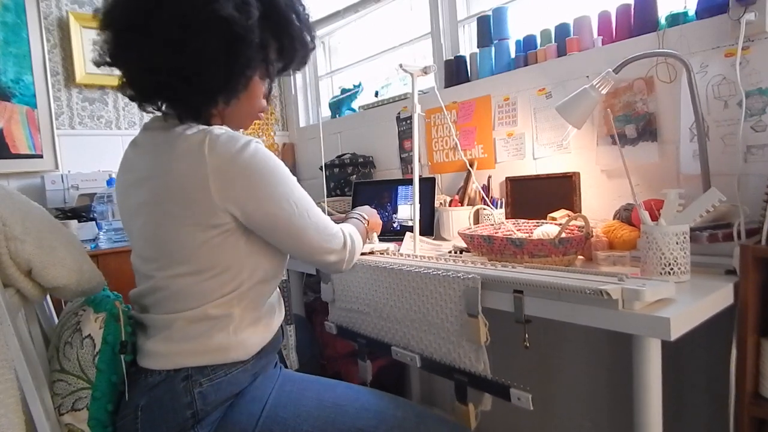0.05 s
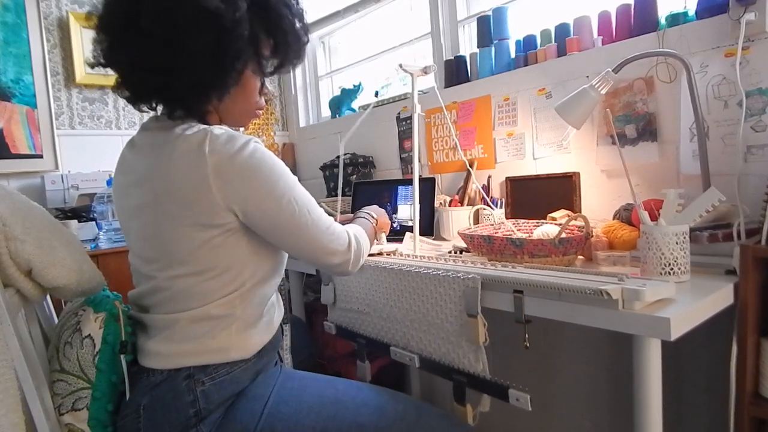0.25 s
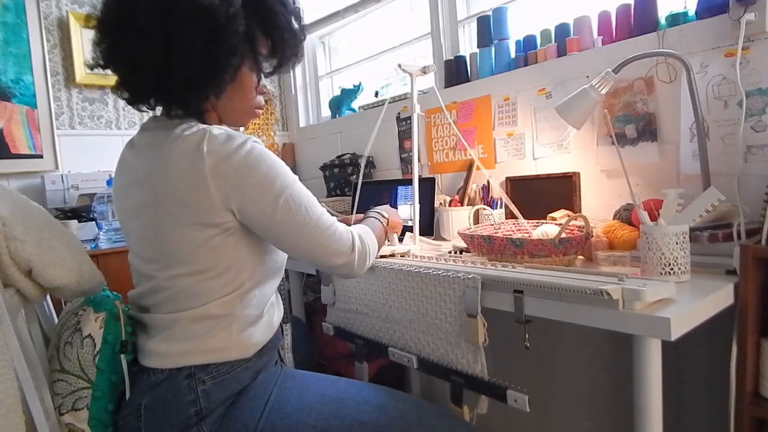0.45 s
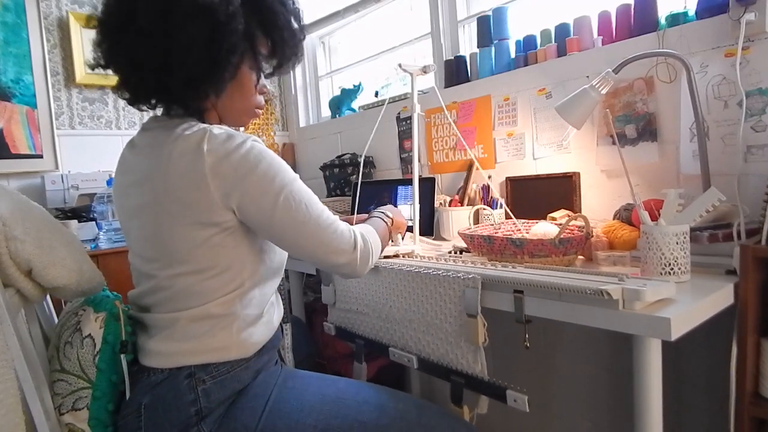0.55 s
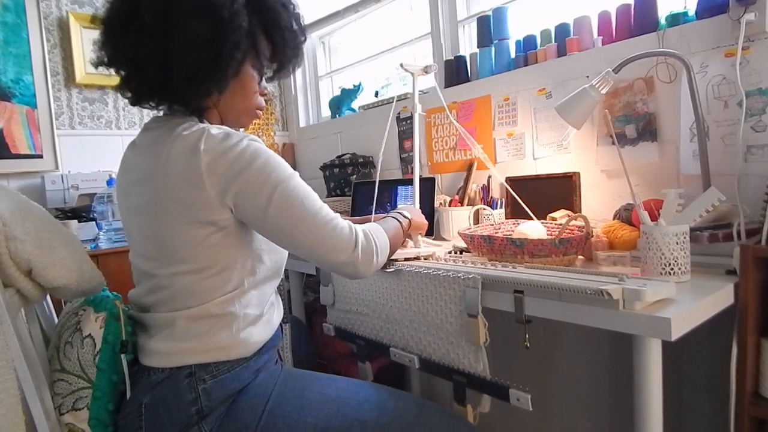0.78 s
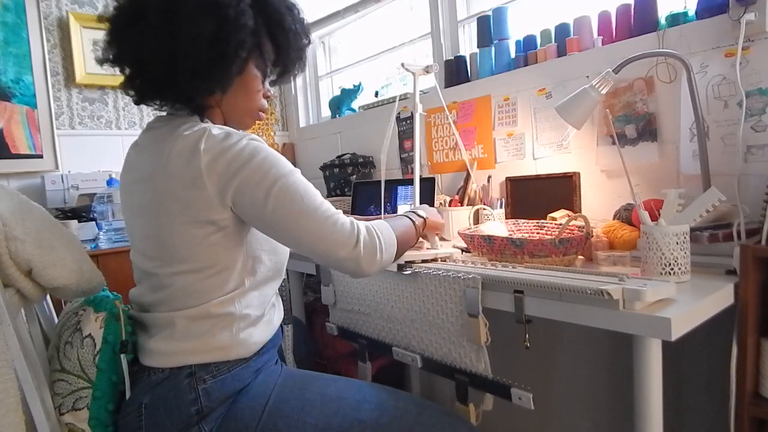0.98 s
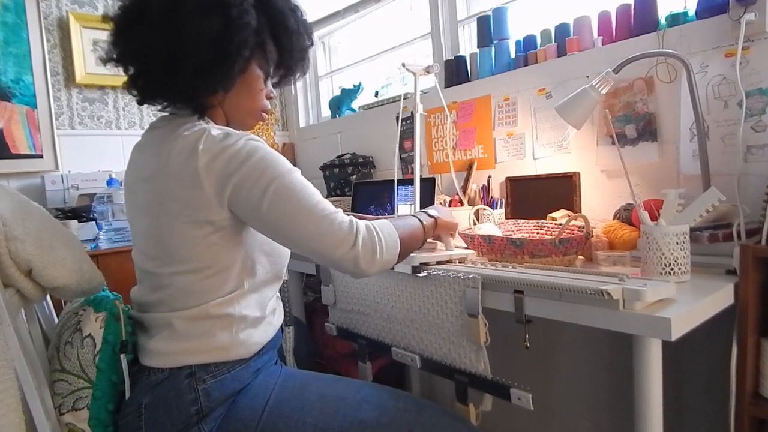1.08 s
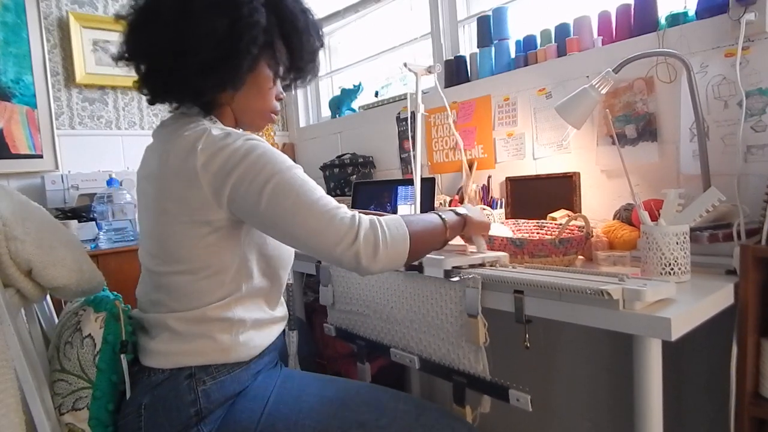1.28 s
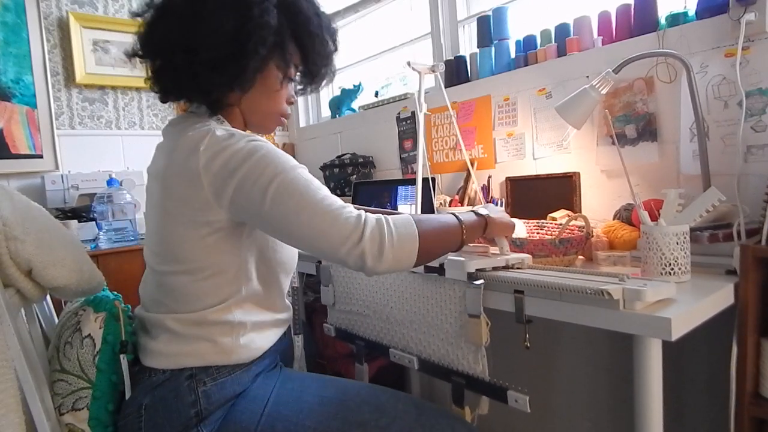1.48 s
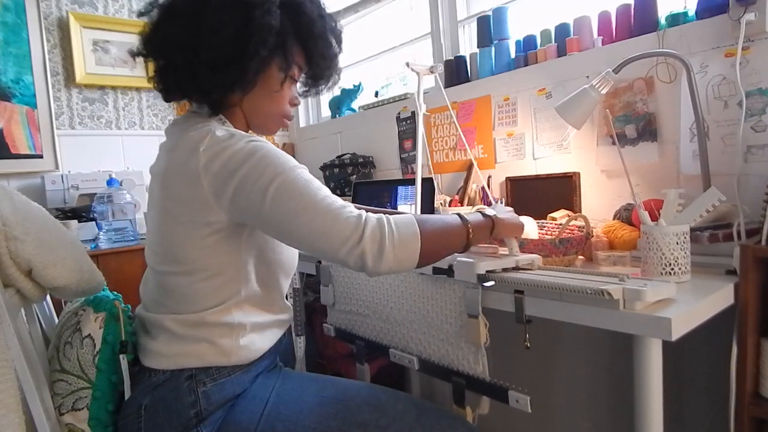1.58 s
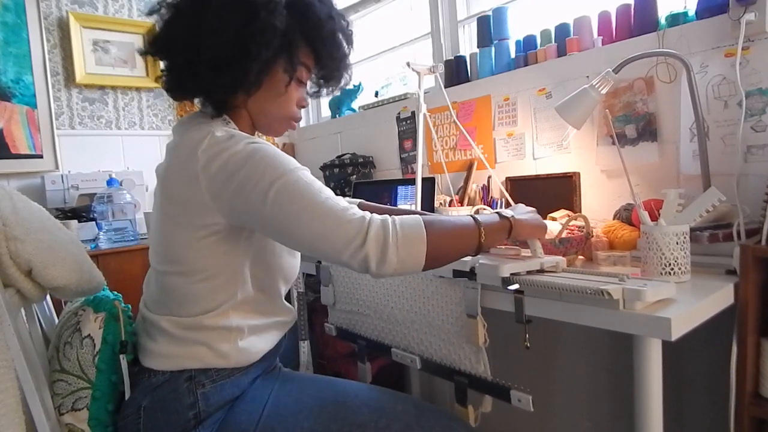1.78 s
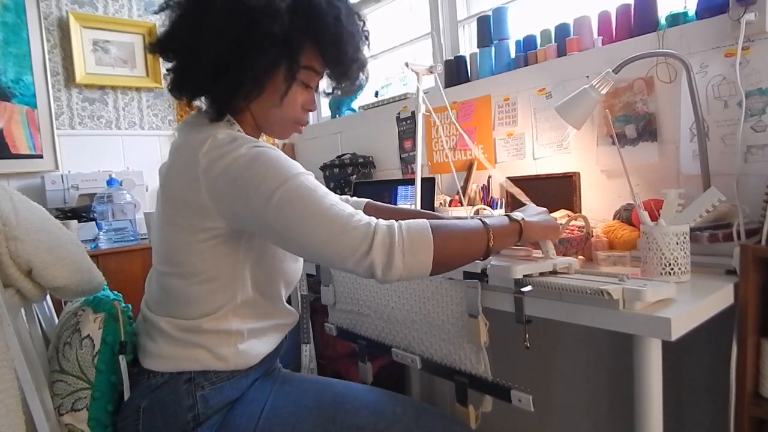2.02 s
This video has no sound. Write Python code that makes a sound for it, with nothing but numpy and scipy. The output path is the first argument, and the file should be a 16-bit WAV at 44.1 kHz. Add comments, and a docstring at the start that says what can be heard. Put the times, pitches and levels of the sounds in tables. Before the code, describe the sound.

A knitting machine carriage slides once along its needle bed in a small quiet room. A bright, steely rasp builds over a low whirr and table rumble, with clattering knocks from about 0.2 seconds that come faster and peak around 1 second. A brief shrill scrape follows at 1.25 seconds. Lighter needle ticks and dull table bumps continue as the carriage coasts to rest by 2 seconds.

```python
"""One pass of a knitting machine

The carriage is pushed once along its needle bed, on a table in a small quiet room. Needles rattle
through the cams in a bright rasp while the bed and table drone. The carriage catches in a run of
clattering knocks that come faster as it gathers speed, scrapes sharply as it leaves the knitting,
then coasts to rest."""
import sys
import numpy as np
from scipy import signal
from scipy.fft import rfft, irfft
from scipy.io import wavfile
from scipy.ndimage import uniform_filter1d

SR = 44100
rng = np.random.default_rng(int(sys.argv[2]) if len(sys.argv) > 2 else 0)


def transcribe(signal):
    """Save signal, clipped to [-1, 1], as a 16-bit WAV file at the path in sys.argv[1]."""
    frames = np.atleast_2d(signal).T
    limited = np.clip(frames, -1, 1)
    pcm = np.round(limited * 32767).astype(np.int16)
    wavfile.write(sys.argv[1], SR, pcm)


N = 90404
T = np.arange(N) / SR


# The swell of the rasp. Each row: time in seconds, relative level in dB.
RASP_SWELL = [(0, -38), (.07, -37.5), (.15, -35.5), (.21, -29), (.31, -30.5), (.44, -27), (.49, -29.5),
              (.535, -41), (.575, -30.5), (.625, -21.5), (.7, -22), (.77, -25.5), (.82, -30.5), (.87, -23),
              (.93, -26.5), (1.02, -19.5), (1.23, -20), (1.34, -26.5), (1.39, -33), (1.49, -32.5),
              (1.52, -28.5), (1.59, -30.5), (1.63, -25.5), (1.76, -27), (1.795, -35.5), (1.86, -34.5),
              (1.94, -41.5), (2.0, -39.5), (2.05, -52)]
# Its bright tone. Each row: frequency in Hz, gain in dB.
RASP_TONE = [(300, -36.5), (1000, 3.5), (2000, 2.5), (3000, -0.5), (4500, -4.5), (7500, -6.5), (9800, 0),
             (11500, -2.5), (13500, -5.5), (16000, -17.5)]
# The ring of steel needles. Each row: pitch in Hz, width in Hz, gain in dB.
NEEDLE_MODES = [(1780, 60, -3), (2259, 40, 0), (2850, 90, -3), (3057, 40, 0), (6900, 150, -9),
                (10300, 500, -7), (11400, 200, -3)]

def needle_rasp(force, pulse):
    """Needles rub through the cams: a bright rasp with a steely ring and chirps on top."""
    swell_db, = in_time(RASP_SWELL)
    rub = rms_one(colour(force, RASP_TONE))
    ring = from_db(-12.5) * resonate(pulse * contacts(N), NEEDLE_MODES)
    return from_db(swell_db - 2) * (rub + ring) + needle_chirps(swell_db)


def needle_chirps(swell_db, per_second=38, pitch_hz=11420, width_hz=80, rub_s=.005):
    """Single needles are rubbed at random and ring at three close pitches, swelling with the rasp."""
    decay = np.exp(-T[:SR // 20] / rub_s)
    out = 0
    for hz in pitch_hz * np.array([.99, 1, 1.01]):
        starts = rng.random(N) < per_second / SR / 3
        sizes = from_db(4 * rng.uniform(-0.92, 1, N))
        rubs = signal.fftconvolve(starts * sizes, decay)[:N] * rng.standard_normal(N)
        out = out + resonate(rubs, [(hz, width_hz, 0)])
    return from_db(-20 + .8 * swell_db) * rms_one(out)


def needle_pulse(per_second=88, depth_db=1.1):
    """The contact force pulses as needle after needle enters the cams, at an unsteady rate."""
    wander = rms_one(uniform_filter1d(rng.standard_normal(N), SR // 50))
    rate_hz = per_second * (1 + 0.24 * wander)
    return from_db(depth_db * np.cos(2 * np.pi * np.cumsum(rate_hz) / SR))


# The carriage catches. Each row: start in seconds, relative levels of clatter, thud and edge in dB,
# length in seconds, ring pitch in Hz, relative ring level in dB, thud pitch in Hz.
CATCHES = [(.094, -27, -35.5, -31, 0.01, 766, -27, 89.5), (.188, -46, -25, -31.5, 0.0099, 793, -40, 165),
           (.241, -19, -19.5, -20.5, 0.015, 880, -16.5, 188),
           (.362, -17.5, -20.5, -20, 0.01, 837, -15.5, 189),
           (.474, -21.5, -17, -20, 0.005, 794, -17.5, 171),
           (.619, -16.5, -16, -36, 0.0055, 786, -10.5, 193), (0.691, -23, -28, -23, 0.029, 603, -32, 194),
           (.777, -27, -19, -18.5, 0.0053, 740, -14, 196), (0.879, -12, -12, -18, 0.0078, 570, -19, 189),
           (.974, -14.5, -15, -16.5, 0.015, 744, -14.5, 177),
           (1.038, -14, -14, -23, 0.014, 1110, -19.5, 175), (1.095, -13, -12.5, -32, 0.017, 664, -13, 180),
           (1.155, -16.5, -19, -44, 0.013, 648, -10.5, 163),
           (1.206, -21, -17.5, -26, 0.023, 437, -18.5, 169.5),
           (1.345, -25.5, -52, -39, 0.004, 530, -26, 170), (1.44, -35, -28, -31, 0.005, 746, -26, 176),
           (1.558, -22.5, -30, -28.5, 0.0075, 780, -35, 89),
           (1.698, -32.5, -25.5, -51, 0.031, 285, -26, 121)]
# The body of the clatter and its hard edge. Each row: frequency in Hz, gain in dB.
CLATTER_TONE = [(120, -23), (270, 6.5), (450, 6), (850, -0.5), (1300, -3), (2200, -16), (4000, -16.5),
                (10000, -42)]
EDGE_TONE = [(400, -18), (1000, 2), (1600, 6), (2300, 3), (3500, -13), (6000, -19), (11000, -8.5),
             (16000, -31)]

def carriage_knocks(release_s=0.013, ring_width_hz=85, thud_lag_s=0.0029):
    """Each catch clatters in the bed, rings in the carriage, has a bright edge and shakes the table."""
    out = np.zeros(N)
    for start, clatter_db, thud_db, edge_db, length, ring_hz, ring_db, thud_hz in CATCHES:
        out += burst(start, clatter_db, length, release_s, needle_bed, CLATTER_TONE)
        out += burst(start, ring_db, length, release_s, resonate, [(ring_hz, ring_width_hz, 0)])
        out += burst(start, edge_db, length, release_s, colour, EDGE_TONE)
        out += table_thud(start + thud_lag_s, thud_db, thud_hz)
    return out


# The ring of bed and carriage. Each row: pitch in Hz, width in Hz, gain in dB.
BED_MODES = [(227, 17, -12.5), (288.2, 15.4, 5.5), (311, 12.2, -7.5), (391, 36, 1), (454.8, 16.6, -10),
             (582, 10, 4.5), (660.3, 68, -1), (784, 37, 6), (883.7, 7.6, -3.5), (951, 42, -0.5),
             (1092, 7.7, -14.5), (1138, 12, 5), (1630, 30, 3.5), (2224, 25, -18)]

def needle_bed(force, tone):
    """The bed's main modes ring over a wash of weaker ones."""
    ring = rms_one(colour(resonate(force, BED_MODES), tone))
    wash = rms_one(colour(force, tone))
    return ring + from_db(-2) * wash


# The swell of the drone. Each row: time in seconds, relative levels of rumble, boom and whirr in dB.
DRONE_SWELL = [(0, -32, -55, -33), (.07, -30, -36.5, -39.5), (.17, -36, -32.5, -37),
               (.32, -32.5, -30, -27.5), (.44, -23, -36, -26), (.55, -33, -33, -32), (.72, -21, -32, -19),
               (.84, -22.5, -36, -27.5), (.95, -19.5, -28, -25.5), (1.05, -24.5, -27, -20),
               (1.21, -23.5, -23.5, -22), (1.29, -22.5, -31.5, -22.5), (1.42, -26, -29, -33),
               (1.53, -26, -35.5, -30.5), (1.6, -23, -27.5, -30.5), (1.7, -15, -26, -24.5),
               (1.82, -25.5, -44, -35.5), (1.92, -37, -37, -40.5), (2.05, -51, -46, -51)]
# The warm whirr and the dark table. Each row: frequency in Hz, gain in dB.
WHIRR_TONE = [(150, -35), (250, 6), (400, 4), (700, -4.5), (1000, -4), (2200, -20.5), (4000, -37),
              (10000, -69)]
TABLE_TONE = [(25, -3), (45, -2), (65, 4.5), (180, 5.5), (260, 2.5), (600, -24)]
# The table's deep rumble and its boom. Each row: pitch in Hz, width in Hz, gain in dB.
RUMBLE_MODES = [(57.4, 14, -10), (79, 28, 0), (105.3, 15, 2), (137, 23, -0.5)]
BOOM_MODES = [(146, 20, -10.5), (174.5, 18.6, 2), (190, 12, -10.5)]

def sliding_drone(force, pulse, hollow_hz=772, hollow_width_hz=30):
    """Sliding sets the bed whirring, the carriage ringing hollowly, the table rumbling and booming."""
    rumble_db, boom_db, whirr_db = in_time(DRONE_SWELL)
    hollow = from_db(-9) * resonate(force, [(hollow_hz, hollow_width_hz, 0)])
    bed = rms_one(needle_bed(pulse * contacts(N), WHIRR_TONE))
    whirr = from_db(whirr_db - 3.5) * rms_one(bed + hollow)
    rumble = from_db(rumble_db - 10) * rms_one(colour(resonate(contacts(N), RUMBLE_MODES), TABLE_TONE))
    boom = from_db(boom_db - 1.5) * rms_one(colour(resonate(contacts(N), BOOM_MODES), TABLE_TONE))
    return whirr + rumble + boom


# The scrape's shrill tone. Each row: frequency in Hz, gain in dB.
SCRAPE_TONE = [(600, -4), (1400, 12), (1950, 0), (2700, -13), (5000, -6), (9000, 4.5), (13000, -8),
               (16000, -21)]
# Its squeal. Each row: pitch in Hz, width in Hz, gain in dB.
SQUEAL_MODES = [(1480, 150, 3), (1920, 150, 2), (6250, 250, -6), (6700, 120, 0), (9000, 400, -10),
                (14700, 500, -9)]

def carriage_scrape(start_s=1.249, length_s=.022, release_s=0.0076):
    """One shrill scrape with a squeal in it, at the edge of the knitting."""
    grit = burst(start_s, -18, length_s, release_s, colour, SCRAPE_TONE)
    squeal = burst(start_s, -18.5, length_s, release_s, resonate, SQUEAL_MODES)
    return grit + squeal


# Single needle snaps. Each row: start in seconds, relative level in dB.
SNAPS = [(.018, -49), (0.126, -50), (.364, -25.5), (.476, -23.5), (0.786, -23), (0.887, -30),
         (1.442, -26.5), (1.505, -30), (1.556, -27.5), (1.658, -24), (1.721, -23), (1.764, -30),
         (1.813, -32.5), (1.846, -32.5), (1.894, -34), (1.979, -32)]
# Their crisp tone. Each row: frequency in Hz, gain in dB.
SNAP_TONE = [(300, -19), (1000, 4.5), (1900, 5), (3000, 4.5), (4500, -2.5), (7500, -4.5), (10500, -1.5),
             (13000, -3), (16000, -32)]

def needle_snaps(length_s=0.0095, release_s=0.009):
    """A needle snaps past a cam with a metallic tick that sets the needles ringing."""
    out = np.zeros(N)
    for start, db in SNAPS:
        out += burst(start, db, length_s, release_s, colour, SNAP_TONE)
        out += burst(start, db - 5, length_s, release_s, resonate, NEEDLE_MODES)
    return out


# Dull bumps. Each row: start in seconds, relative level in dB, pitch in Hz.
TABLE_BUMPS = [(.436, -29.5, 178), (.68, -29, 73), (0.712, -20, 195), (1.351, -20, 163.5),
               (1.588, -24.5, 127), (1.653, -24, 139), (1.765, -29, 128), (1.941, -25.5, 183)]

def table_bumps():
    """The table bumps under the moving carriage, its pitch depending on where the carriage stands."""
    return sum(table_thud(start, db, hz) for start, db, hz in TABLE_BUMPS)


def table_thud(start, db, hz, rise_s=0.0079):
    """The table swells into a few cycles of swing and settles."""
    t = np.maximum(T - start, 0)
    envelope = t / rise_s * np.exp(1 - t / rise_s)
    return from_db(db + 3) * envelope * np.sin(2 * np.pi * hz * t)


# The room's low hush. Each row: frequency in Hz, gain in dB.
HUSH_TONE = [(25, -5), (55, -4), (100, 3), (250, 1.5), (1000, -20), (15000, -48)]

def small_room(direct, t60_s=0.27):
    """Dense reflections die away behind the direct sound, over a steady hush."""
    t = T[:SR // 2]
    tail = rng.standard_normal(len(t)) * from_db(-60 * t / t60_s)
    reflections = signal.fftconvolve(direct, tail / np.linalg.norm(tail))[:N]
    hush = rms_one(colour(rng.standard_normal(N), HUSH_TONE))
    return direct + from_db(-8) * reflections + from_db(-43) * hush


def contacts(count, per_second=1800, spread_db=2, friction=0.56):
    """Tiny impacts of uneven size over smooth friction."""
    sizes = from_db(spread_db * np.minimum(rng.exponential(1, count), 4))
    signs = rng.choice([-1, 1], count)
    hits = rng.random(count) < per_second / SR
    return rms_one(rms_one(sizes * signs * hits) + friction * rng.standard_normal(count))


def burst(start, db, length, release, body, voicing, attack_s=.002):
    """A short flurry of contacts through a body, voiced by a tone curve or a set of modes."""
    t = T[:SR // 4]
    envelope = np.minimum(t / attack_s, 1) * np.exp(-np.maximum(t - length, 0) / release)
    sound = rms_one(body(envelope * contacts(len(t)), voicing))
    gain = from_db(db) * np.sqrt(np.mean(envelope ** 2) / 2)
    return gain * np.pad(sound, (max(int(start * SR), 0), N))[:N]


def resonate(x, modes):
    """Parallel resonances of alternating sign, at unit power."""
    out = 0
    for k, (hz, width, db) in enumerate(modes):
        radius = np.exp(-np.pi * width / SR)
        feedback = [1, -2 * radius * np.cos(2 * np.pi * hz / SR), radius ** 2]
        ring = (1 - radius ** 2) * signal.lfilter([1, 0, -1], feedback, x)
        out = out + (-1) ** k * from_db(db) * ring
    return rms_one(out)


def colour(x, tone, size=4096):
    """A minimum-phase equaliser that follows a tone curve."""
    hz, db = np.transpose(tone)
    grid_hz = np.maximum(np.arange(size // 2 + 1) * SR / size, 1)
    gain = from_db(np.interp(np.log(grid_hz), np.log(hz), db))
    cepstrum = irfft(np.log(gain))
    cepstrum[1:size // 2] *= 2  # folded so that nothing rings ahead of a hit
    cepstrum[size // 2 + 1:] = 0
    impulse = irfft(np.exp(rfft(cepstrum)))
    return signal.fftconvolve(x, impulse)[:len(x)]


def in_time(rows):
    """Each level column of a swell, drawn out to every sample."""
    times, *columns = np.transpose(rows)
    return [np.interp(T, times, column) for column in columns]


def from_db(db):
    """Decibels to gain."""
    return 10 ** (np.asarray(db) / 20)


def rms_one(x):
    """Scale to unit power."""
    return x / np.sqrt(np.mean(x ** 2) + 1e-20)


def machine(pulse):
    """The slide and all its hits; one contact force drives both the rasp and the hollow note."""
    force = pulse * contacts(N)
    slide = needle_rasp(force, pulse) + sliding_drone(force, pulse)
    return slide + carriage_knocks() + carriage_scrape() + needle_snaps() + table_bumps()


# Stereo width. Each row: frequency in Hz, side level against mid in dB.
SIDE_TONE = [(30, -8), (90, -17), (180, -24), (350, -11), (700, -13), (1400, -7), (2800, -2.5), (5600, -.5),
             (12000, .5)]

def scene(lean_left_db=.4):
    """Contacts are spread along the bed: centred in the bass, wide in the treble."""
    pulse = needle_pulse()
    mid = small_room(machine(pulse))
    side = colour(small_room(machine(pulse)), SIDE_TONE)
    return np.array([(mid + side) * from_db(lean_left_db), (mid - side) * from_db(-lean_left_db)])


# Narrow dips in the treble. Each row: centre in Hz, width in Hz.
TREBLE_DIPS = [(2440, 70), (7550, 130)]

def record(dry, ceiling=1.3, cutoff_hz=15800):
    """Two narrow dips colour the sound, peaks are rounded and the top is cut."""
    for hz, width in TREBLE_DIPS:
        dry = signal.lfilter(*signal.iirnotch(hz, hz / width, fs=SR), dry)
    rounded = ceiling * np.tanh(dry / ceiling)
    lowpass = signal.ellip(12, .1, 90, cutoff_hz, fs=SR, output="sos")
    return signal.sosfilt(lowpass, rounded)


dry = scene()
out = record(dry)
transcribe(out)
```